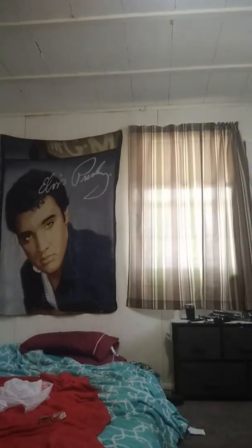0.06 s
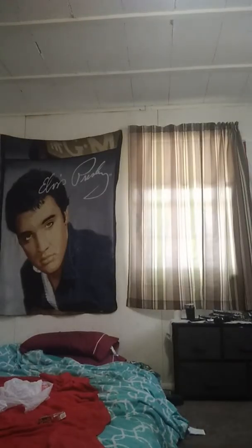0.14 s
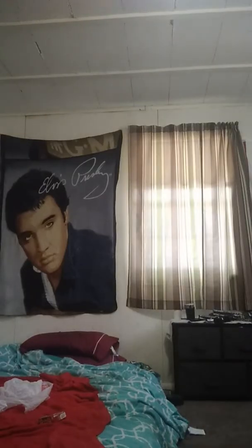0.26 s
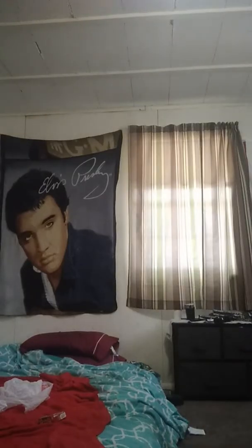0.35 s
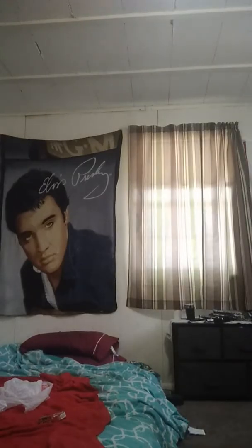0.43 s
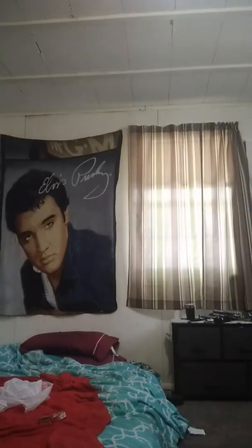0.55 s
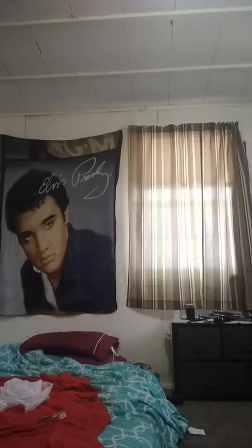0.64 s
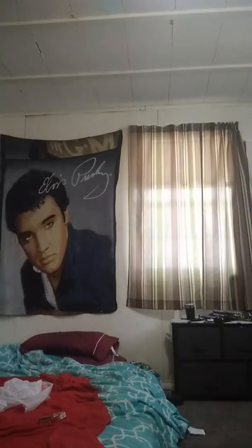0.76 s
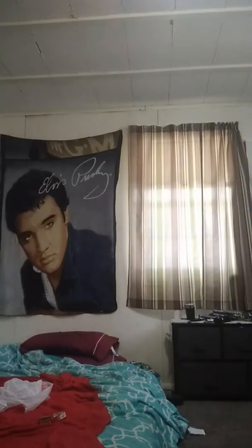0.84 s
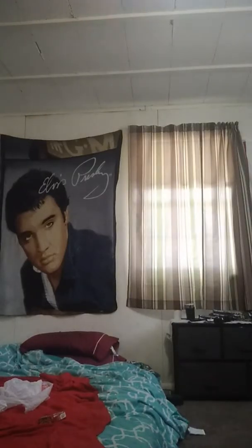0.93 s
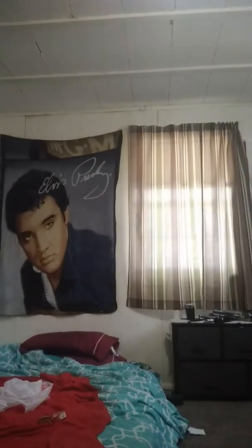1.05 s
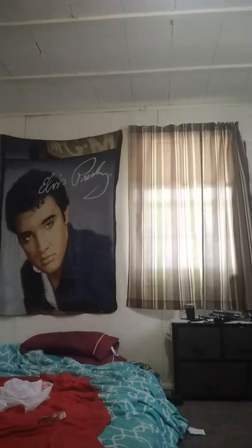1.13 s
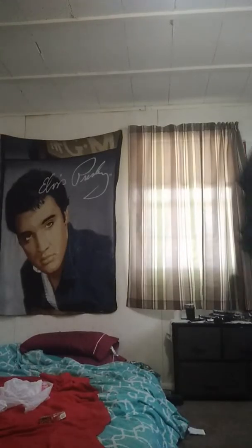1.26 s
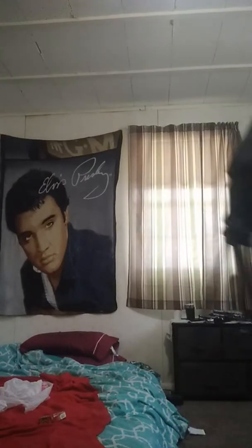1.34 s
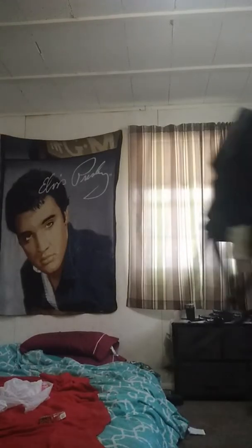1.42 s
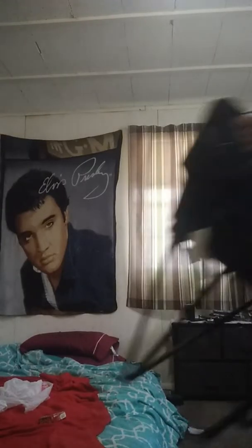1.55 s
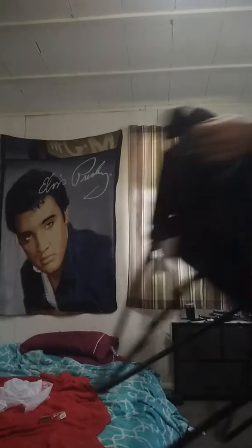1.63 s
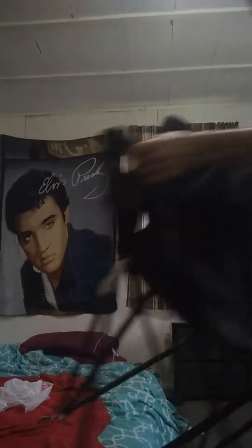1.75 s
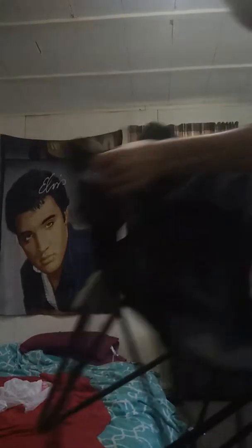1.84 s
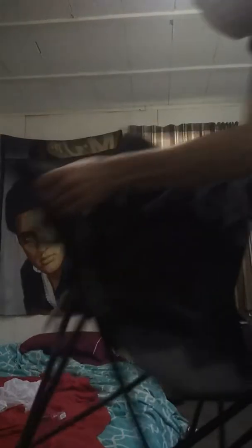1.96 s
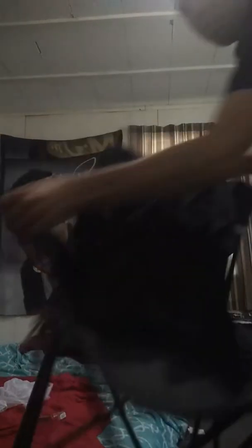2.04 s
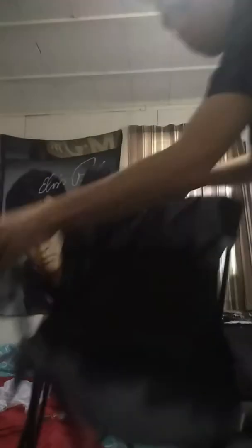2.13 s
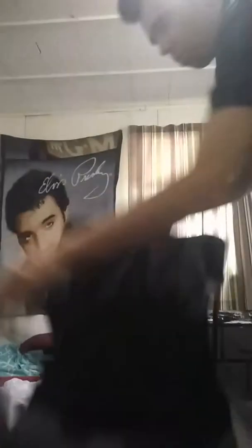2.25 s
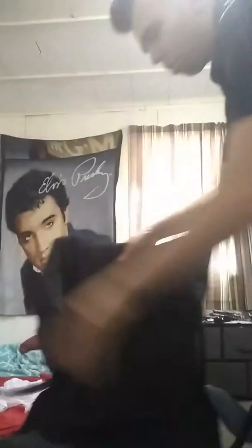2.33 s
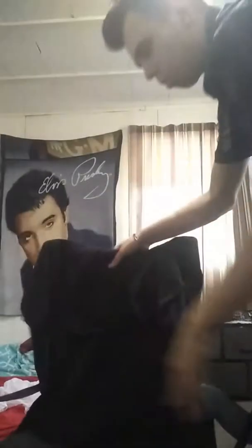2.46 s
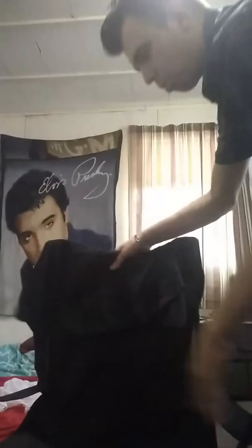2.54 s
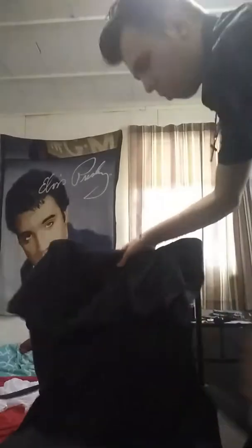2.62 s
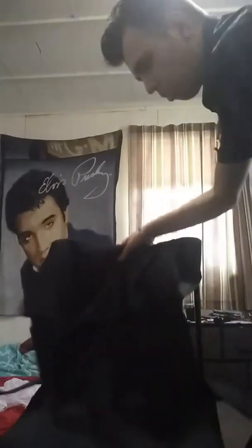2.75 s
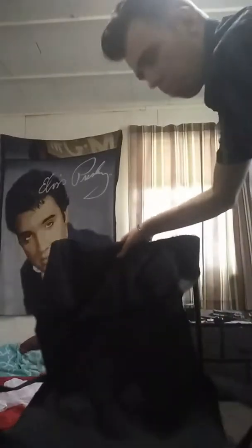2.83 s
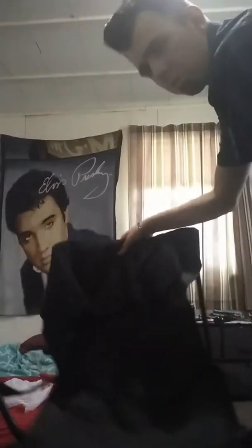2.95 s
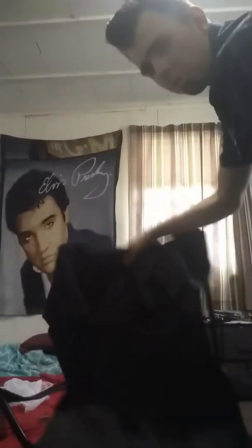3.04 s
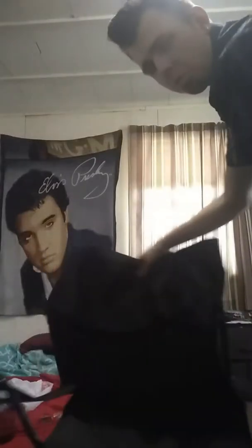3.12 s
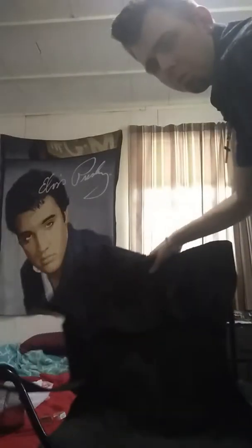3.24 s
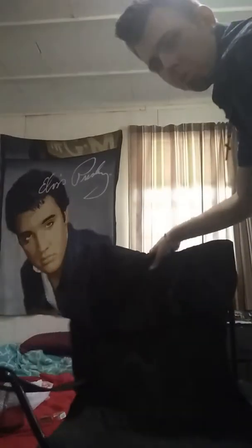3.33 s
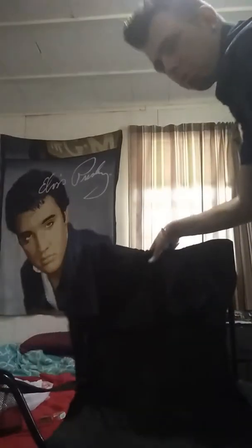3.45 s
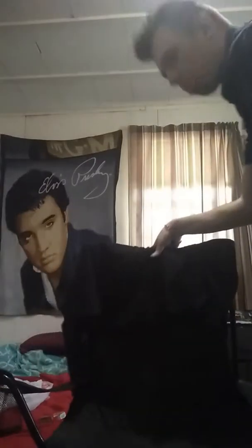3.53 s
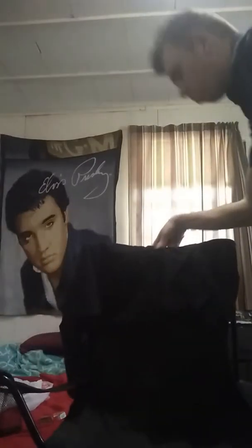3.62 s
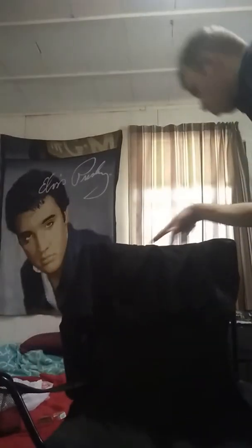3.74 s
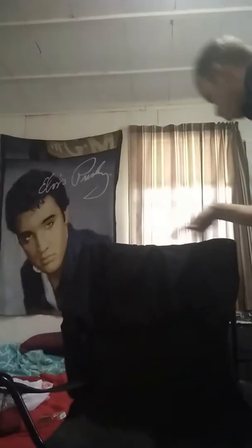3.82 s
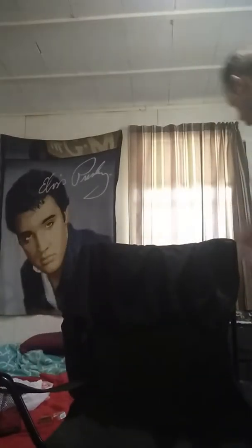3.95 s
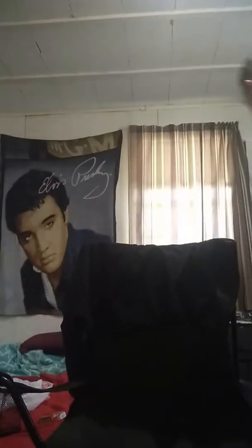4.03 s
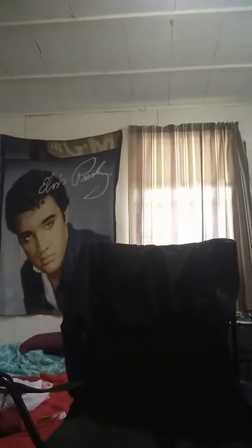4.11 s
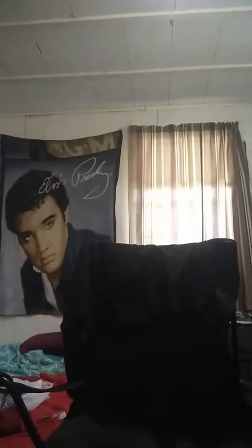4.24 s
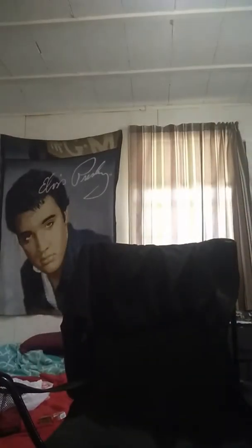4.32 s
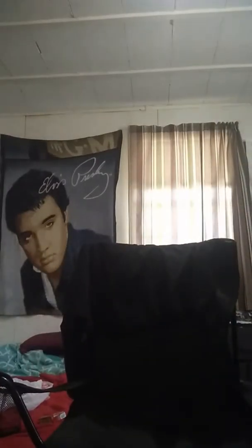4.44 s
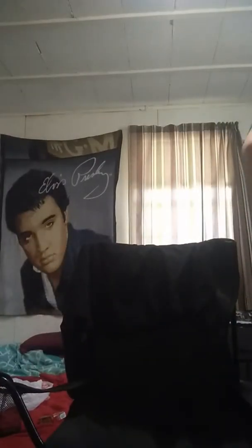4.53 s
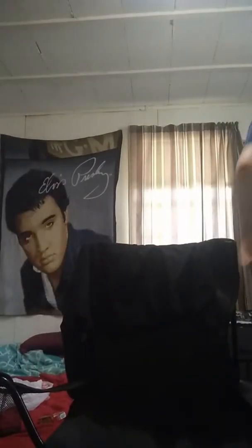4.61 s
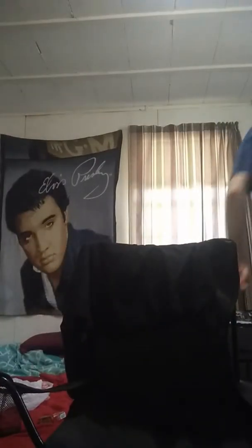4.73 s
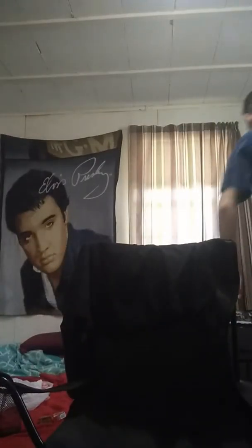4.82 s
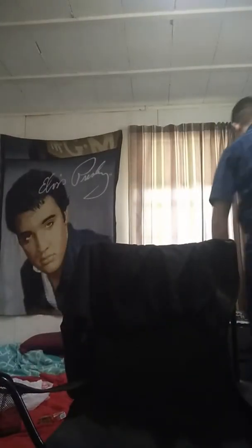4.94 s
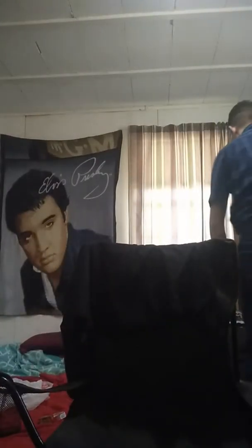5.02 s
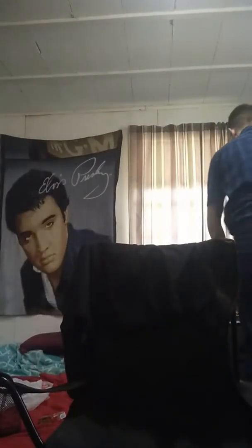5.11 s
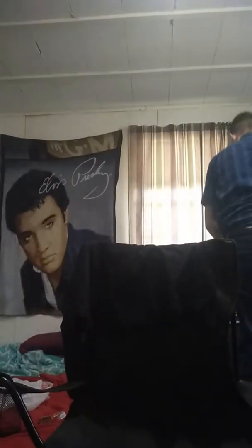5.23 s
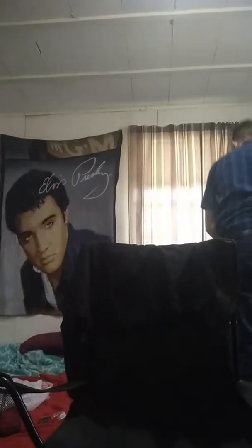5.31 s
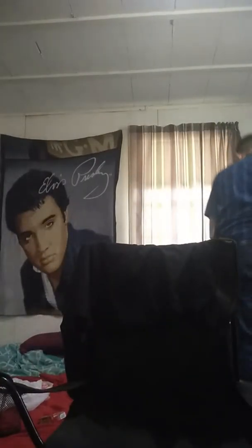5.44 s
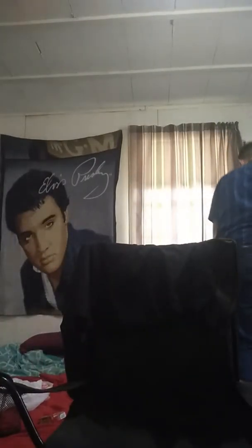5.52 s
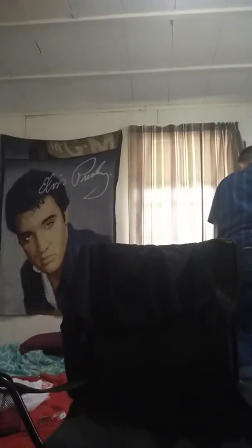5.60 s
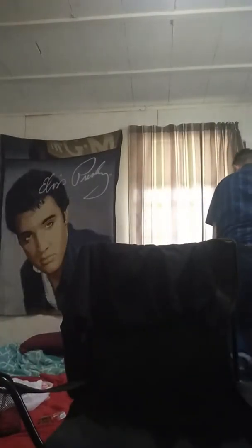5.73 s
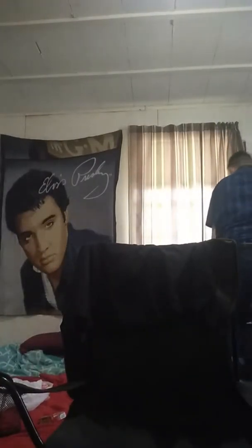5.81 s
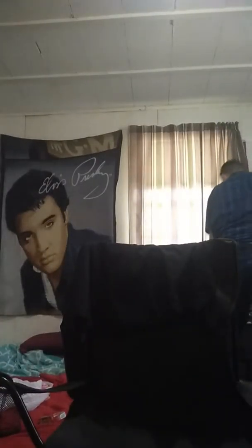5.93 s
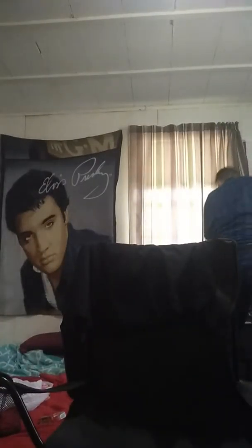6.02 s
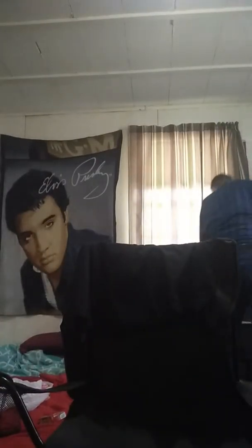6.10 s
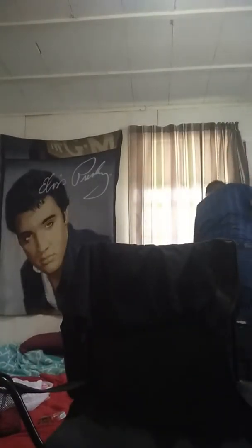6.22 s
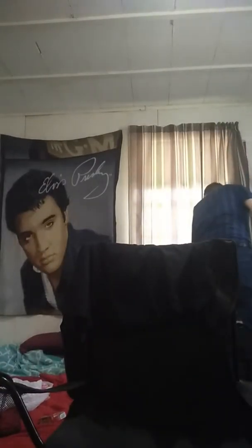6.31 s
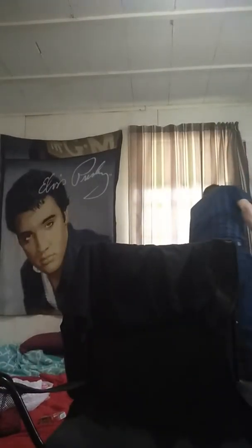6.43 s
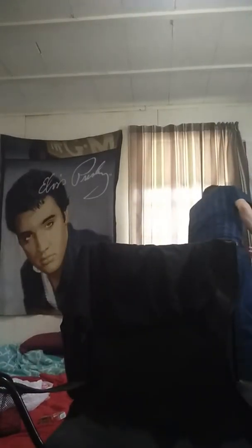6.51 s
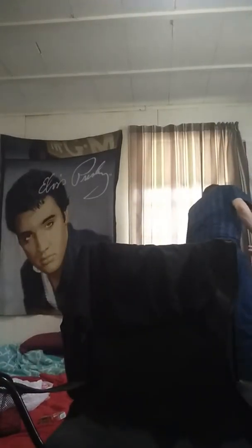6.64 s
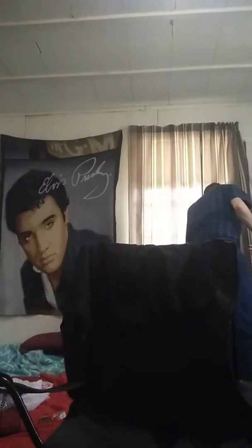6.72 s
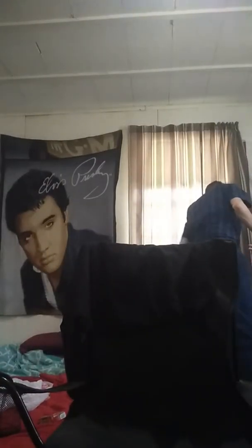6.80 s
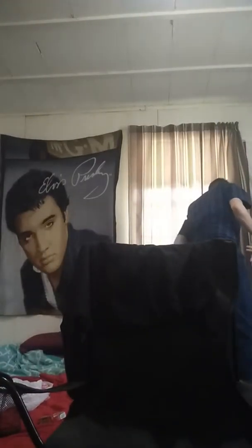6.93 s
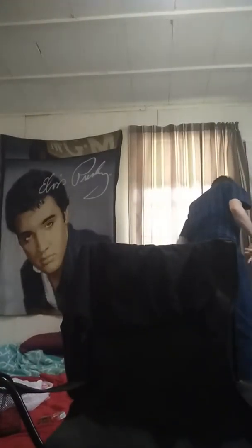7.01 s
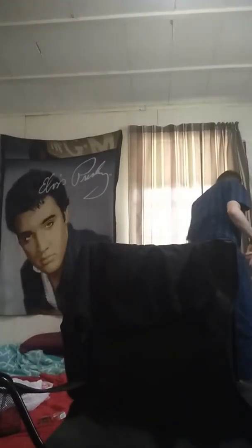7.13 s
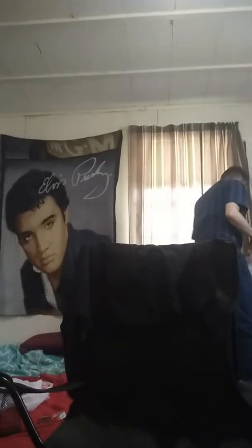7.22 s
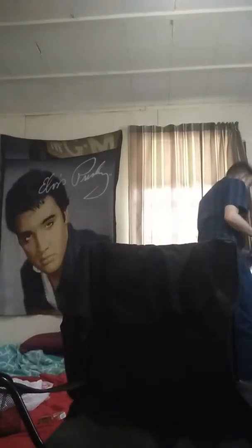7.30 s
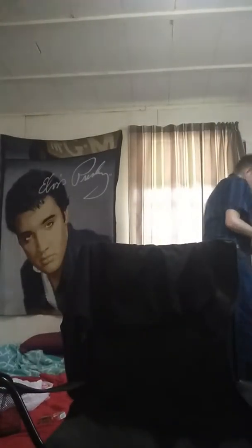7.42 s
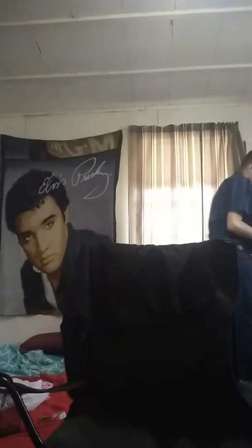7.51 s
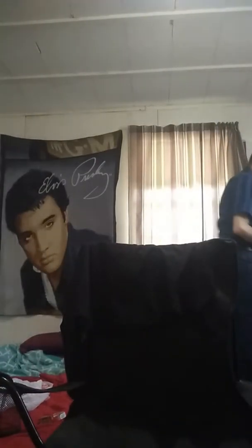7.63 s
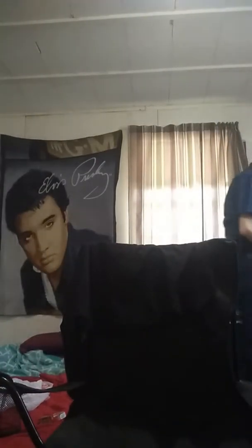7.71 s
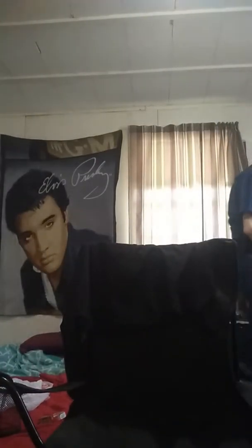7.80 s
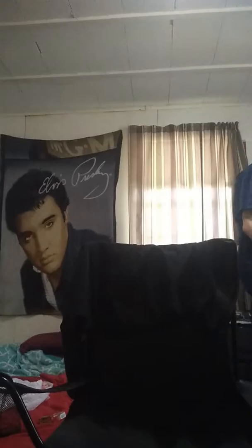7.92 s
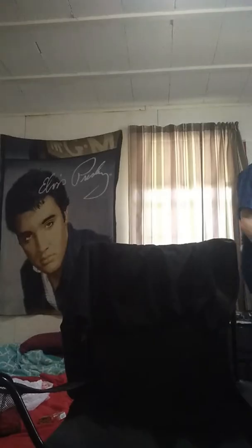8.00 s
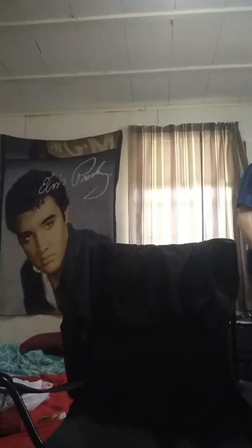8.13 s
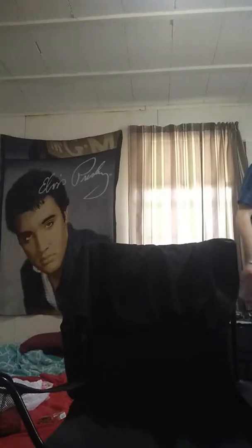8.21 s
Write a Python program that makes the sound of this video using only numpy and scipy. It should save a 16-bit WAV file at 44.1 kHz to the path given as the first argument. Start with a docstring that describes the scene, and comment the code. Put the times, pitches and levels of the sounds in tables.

```python
"""Folding chair and fan in a small bedroom.

A chair of steel tubes and cloth is set down and dragged; footsteps and a switch clack join its knocks.
Excited modes make rattle, knocks and floor rumble; filtered noise makes cloth and fan, which runs up.
Decaying sines make floor booms; delays add the room; a noise gate lowers and flickers quiet moments.
"""
import sys
import numpy as np
from scipy import signal
from scipy.fft import rfft, irfft, next_fast_len
from scipy.io import wavfile
from scipy.ndimage import uniform_filter1d

SR = 44100
rng = np.random.default_rng(int(sys.argv[2]) if len(sys.argv) > 2 else 0)


def wav_out(sig):
    """Save sig, one row per channel (or a flat mono array), as 16-bit PCM at SR to the path in sys.argv[1]."""
    wavfile.write(sys.argv[1], SR, np.round(np.clip(np.atleast_2d(sig).T, -1, 1) * 32767).astype(np.int16))


N = 364266


def from_db(db):
    """Decibels to amplitude gain."""
    return 10 ** (np.asarray(db) / 20)


def rms_one(x):
    """Scale to unit rms."""
    return x / np.sqrt(np.mean(x ** 2) + 1e-20)


def in_time(rows, before=None, after=None):
    """Table columns after t/s, interpolated per sample."""
    time_s, *columns = np.transpose(rows)
    return [np.interp(np.arange(N) / SR, time_s, c, before, after) for c in columns]


def drift(rate_hz):
    """Slow noise of unit rms: two equal poles at rate_hz, run at SR / 40."""
    r = np.exp(-80 * np.pi * rate_hz / SR)
    noise = rng.standard_normal(N // 40 + 2002)
    slow = signal.lfilter([1], [1, -2 * r, r * r], noise)[2000:]  # drop settling
    return np.interp(np.arange(N) / 40, np.arange(len(slow)), rms_one(slow))


def coloured(x, spectrum):
    """Shape a white signal, dB linear in log f; unit rms."""
    hz, db = np.transpose(spectrum)
    grid_hz = np.maximum(np.arange(N // 2 + 1) * SR / N, 1)
    gain = from_db(np.interp(np.log(grid_hz), np.log(hz), db))
    return rms_one(irfft(rfft(x) * gain, N))


def ring(x, hz, t60_s):
    """Two-pole resonator: a unit click starts a decaying sine of initial height about 1."""
    r, w = from_db(-60 / (t60_s * SR)), 2 * np.pi * hz / SR
    return signal.lfilter([0, np.sin(w)], [1, -2 * r * np.cos(w), r * r], x + 1e-18)


def grains(per_s, spread_db):
    """Random clicks of random sign and uneven size."""
    sizes = from_db(spread_db * np.minimum(rng.exponential(1, N), 4)) * rng.choice([-1, 1], N)
    return sizes * (rng.random(N) < per_s / SR)


def cut(x, hz, kind):
    """Second-order high- or low-pass."""
    return signal.sosfilt(signal.butter(2, hz, kind, fs=SR, output="sos"), x)


def place(out, start_s, sound):
    """Track with a sound added at start_s."""
    i = round(start_s * SR)
    n = min(len(sound), N - i)
    return np.concatenate([out[:i], out[i:i + n] + sound[:n], out[i + n:]])


# quiet-house noise spectrum: f/Hz, relative level/dB per Hz
STILL_SPECTRUM = [(18, -44), (30, -19.5), (42, -13), (64, -10.5), (85, -23.5), (208, -16.5), (243, -22),
                  (299, -24), (492, -26.5), (575, -26.5), (1330, -32.5), (4540, -38.5), (15500, -45.5)]
STILL_RMS_DB = -56


def still_house():
    """Stationary coloured noise of the quiet house."""
    return from_db(STILL_RMS_DB) * coloured(rng.standard_normal(N), STILL_SPECTRUM)


HUM_HZ, HUM_DB, HUM_OCTAVE_DB, HUM_WAVER_DB = 58.9, -56, -8, 1.5


def hum():
    """Low tone and its octave, wavering together in level."""
    phase = 2 * np.pi * HUM_HZ * np.arange(N) / SR
    tones = np.sin(phase) + from_db(HUM_OCTAVE_DB) * np.sin(2 * phase)
    return from_db(HUM_DB + HUM_WAVER_DB * drift(8)) * np.sqrt(2) * tones


TICKS_PER_S, TICK_DB, TICK_T60_S = 12, -59, .04


def ticks():
    """Sparse random faint ticks: decaying puffs of band-limited noise that briefly lift the gate."""
    r = from_db(-60 / (TICK_T60_S * SR))
    clicks = np.abs(grains(TICKS_PER_S, spread_db=2.0))
    puffs = signal.lfilter([1], [1, -r], clicks + 1e-18)
    grit = rms_one(cut(cut(rng.standard_normal(N), 150, "high"), 1500, "low"))
    return from_db(TICK_DB) * puffs * grit


# faint tones: start t/s, end t/s, mean level/dB, f/Hz
WHINES = [(1.795, 1.885, -69, 11900), (6.43, 6.48, -56, 1140), (7.8, 7.88, -65, 11900)]


def whines():
    """Short sines with 15 ms ramps, wavering in level."""
    t, waver = np.arange(N) / SR, from_db(7.5 * drift(30))
    tones = np.zeros(N)
    for start_s, end_s, db, hz in WHINES:
        ramps = np.clip(np.minimum(t - start_s, end_s - t) / 0.015, 0, 1)
        tones += from_db(db) * ramps * np.sin(2 * np.pi * hz * t)
    return waver * tones


# fan airflow spectrum: f/Hz, relative level/dB per Hz
FAN_SPECTRUM = [(35, -28.5), (60, 2), (148, -8), (194, -0.5), (283, -10), (458, -4.5), (520, -14.5),
                (697, -7), (860, -12), (1310, -14), (1720, -23), (2350, -23), (9000, -42.5), (11700, -42),
                (19800, -120)]
# casing resonances: f/Hz, nominal width/Hz, level/dB re airflow
FAN_CASING = [(1316, 150, -14.5), (2358, 280, -16)]
# fan run-up: t/s, mean airflow level/dB
FAN_RUN_UP = [(6.0, -59.5), (6.4, -56.5), (6.65, -53), (7.1, -45.5), (7.6, -41), (8.26, -37.5)]


def fan():
    """Airflow noise plus casing resonances; level rises with run-up, spectrum stays fixed."""
    air = coloured(rng.standard_normal(N), FAN_SPECTRUM)
    casing = np.zeros(N)
    for hz, width_hz, db in FAN_CASING:
        resonance = ring(rng.standard_normal(N), hz, 2.5 / width_hz)
        casing += from_db(db) * rms_one(resonance)
    level_db, = in_time(FAN_RUN_UP, before=-120)
    return from_db(level_db + 1.13 * drift(15.5)) * (air + casing)


# weight landing on floor: t/s, nominal level/dB (1 dB added), boom f/Hz, t60/s
THUMPS = [(0.247, -33, 56, 0.17), (1.549, -12.5, 61.7, 0.15), (2.238, -18, 81, 0.13),
          (2.242, -11, 191, 0.07), (2.589, -37, 101, .2), (4.796, -33, 109.3, 0.21),
          (5.422, -32, 55.6, 0.17), (5.506, -36, 130.8, 0.194), (5.982, -30, 56.8, 0.15),
          (7.281, -9, 110, 0.088), (7.455, -29, 114, 0.16)]


def thumps():
    """Soft push sets the floor booming: decaying sine with smooth onset."""
    out, t = np.zeros(N), np.arange(SR // 2) / SR
    for start_s, db, hz, t60_s in THUMPS:
        swell = 1 - np.exp(-t / 0.0068)
        envelope = from_db(db + 1 - 60 * t / t60_s) * swell
        out = place(out, start_s, -envelope * np.sin(2 * np.pi * hz * t))
    return out


# thin high ringing bands: t/s, nominal level/dB (6 dB added), f/Hz, envelope t60/s
HIGH_RINGS = [(.607, -52, 6304, .1), (.607, -52, 9421, .2), (.607, -58, 12230, .1), (1.402, -49, 7500, .4),
              (1.402, -54, 8180, .4), (2.3, -49, 7550, .35), (2.296, -50, 12100, .1),
              (7.226, -52, 3600, .1), (7.226, -54, 4500, .1)]


def high_rings():
    """Thin high ringing bands: narrow noise at f, dying away."""
    out, t = np.zeros(N), np.arange(SR // 2) / SR
    for start_s, db, hz, t60_s in HIGH_RINGS:
        narrow = rms_one(ring(rng.standard_normal(len(t)), hz, .025))
        out = place(out, start_s, from_db(db + 6 - 60 * t / t60_s) * narrow)
    return out


# bright skids of steel legs: t/s, level/dB before decay, nominal f/Hz (both cutoffs near 0.83 f), t60/s
SKIDS = [(2.246, -29, 8150, 0.36), (6.727, -31.5, 8800, 0.13), (7.459, -37, 9040, 0.1)]


def skids():
    """Steel legs skid on the floor: uneven bright noise dying away."""
    out, t = np.zeros(N), np.arange(SR // 2) / SR
    for start_s, db, hz, t60_s in SKIDS:
        shake = rng.standard_normal(len(t)) * from_db(2.2 * drift(80)[:len(t)])
        bright = cut(cut(shake, hz / 1.2, "high"), hz / 1.2, "high")
        band = rms_one(cut(bright, hz * 0.83, "low"))
        envelope = from_db(db - 60 * t / t60_s) * (1 - np.exp(-t / 0.002))
        out = place(out, start_s, envelope * band)
    return out


# moves of chair and feet: start t/s, nominal held-until t/s, nominal end t/s (a few rows out of order),
# rattle level/dB, rustle level/dB, cloth treble lift/dB, rumble level/dB
MOVES = [(0.148, 0.196, 0.22, -54, -48.5, -3, -50), (0.228, 0.4, 0.48, -46.5, -51, 5, -39.5),
         (0.395, 0.58, 0.62, -45, -52, 6, -52), (0.603, 0.697, 0.72, -44, -46.5, 2, -57),
         (0.69, 0.819, 0.9, -41, -49, 0, -52), (1.352, 1.506, 1.594, -46, -43, 3, -60),
         (1.53, 1.6, 1.8, -39.5, -42, -0.5, -34), (1.688, 1.865, 1.884, -51, -55, 2, -42),
         (1.918, 1.95, 2.02, -61, -63.5, 4, -58), (1.955, 1.98, 1.988, -61, -58.5, 5, -48),
         (1.991, 2.015, 1.96, -62, -60, 7.5, -58), (2.067, 2.144, 2.166, -71, -46, 4.5, -51),
         (2.224, 2.262, 2.44, -43, -33, 13.5, -26), (2.34, 2.48, 2.54, -44.5, -48.5, -2, -41),
         (2.563, 2.695, 2.76, -39, -42.5, -0.5, -44), (2.702, 2.785, 2.802, -49, -51, 6, -56),
         (2.858, 2.875, 2.9, -56, -60, 4, -54), (2.955, 3.034, 3.13, -60, -54, 7.5, -49.5),
         (3.045, 3.077, 3.24, -58, -35, -6, -39), (3.236, 3.255, 3.29, -42, -41.5, -10.5, -42),
         (3.391, 3.551, 3.57, -74, -47.5, 6, -52), (3.865, 3.885, 3.893, -60, -60, 4, -50),
         (4.037, 4.088, 4.102, -70, -60, 4.5, -49), (4.108, 4.138, 4.152, -62, -50, 8, -52),
         (4.748, 4.86, 4.91, -71.5, -54.5, 3, -37), (5.334, 5.385, 5.46, -62, -54, 6, -44.5),
         (5.42, 5.459, 5.497, -59.5, -61, 2.5, -43.5), (5.499, 5.535, 5.6, -56.5, -58.5, 5, -42.5),
         (5.942, 6.018, 6.01, -62, -52.5, 1, -42.5), (6.67, 6.72, 6.5, -50, -50, -2, -50),
         (6.72, 6.776, 6.88, -37, -37, 5.5, -48), (6.8, 6.882, 6.8, -47, -58, -4, -48),
         (7.223, 7.294, 7.38, -44, -44, -0.5, -32), (7.454, 7.48, 7.53, -62, -35, 0.5, -49)]
RISE_MAX_S, RISE_DB = .03, 8.0
END_MAX_DB, FADE_DB_PER_S = -56.5, 1200


def strength(column):
    """Layer gain from interpolated move levels; powers add."""
    power, t = np.zeros(N), np.arange(N) / SR
    for row in MOVES:
        start, held, end, db = *row[:3], row[column]
        near = slice(max(round((start - .01) * SR), 0), round((end + .1) * SR))
        held = np.clip(held, start + .004, end - .002)
        end_db = min(db, END_MAX_DB)
        full = start + min(RISE_MAX_S, (held - start) / 3)
        times_s = [start - .01, start, full, held, end, end + .1]
        levels_db = [db - 60, db - RISE_DB, db, db, end_db, end_db - FADE_DB_PER_S / 10]
        power[near] += from_db(2 * np.interp(t[near], times_s, levels_db))
    return np.sqrt(power)


# frame modes: f/Hz, level/dB, knock t60/s (scaled in rattle)
FRAME = [(261, -5, 0.12), (376.6, -1.5, 0.054), (508, 3, 0.032), (647.5, -3, 0.056), (895, 0.5, 0.023),
         (1029, 1.5, 0.044), (1268, -4.5, 0.029), (1820, 0, 0.019), (2098, -11.5, .04), (2560, -18.5, .04),
         (3000, -15, 0.013), (3870, -12.5, 0.022)]


def tube_rattle():
    """Loose joints tick into the frame modes; unit rms."""
    joints = [grains(700, spread_db=4.0) for _ in range(3)]
    rattle = np.zeros(N)
    for k, (hz, db, t60_s) in enumerate(FRAME):
        rattle += from_db(db) * ring(joints[k % 3], hz, 0.24 * t60_s)
    return rms_one(rattle)


def patchy(x, patch_db):
    """Folds of cloth slip in turn: each band swells and fades on its own; unit rms."""
    edges_hz = np.geomspace(400, 16000, 9)
    total = np.zeros(N)
    for pair in zip(edges_hz, edges_hz[1:]):
        band = signal.sosfilt(signal.butter(1, pair, "band", fs=SR, output="sos"), x)
        total += from_db(patch_db * drift(18)) * band
    return rms_one(total)


# cloth spectrum: f/Hz, relative level/dB per Hz
CLOTH = [(500, 5), (1500, -0.5), (2500, 2), (4500, -4), (7000, -10), (10000, -14.5), (16000, -23.5)]


def cloth_rustle():
    """Fibres slip: dense shaped clicks, patchy by band, with treble lift interpolated between moves."""
    lift_db, = in_time(sorted((s, row[5]) for row in MOVES for s in row[:2]))
    slips = grains(5000, spread_db=3.0) * from_db(1.2 * drift(45))
    rustle = patchy(coloured(slips, CLOTH), patch_db=1.5)
    treble = cut(rustle, 4000, "high")
    return rustle + (from_db(lift_db) - 1) * treble


# floor modes: f/Hz, nominal width/Hz (t60 = 3 / width), level/dB
BOARDS = [(54.6, 44, 2.5), (87.4, 8.3, 0), (115, 85, 2), (172, 34, -10), (226, 83, -0.5)]


def floor_rumble():
    """Boards carry the load: one noise drives all floor modes; unit rms."""
    load = rng.standard_normal(N)
    rumble = np.zeros(N)
    for k, (hz, width_hz, db) in enumerate(BOARDS):
        gain = from_db(db) * np.sqrt(width_hz / hz) * (-1) ** k
        rumble += gain * ring(load, hz, 3.0 / width_hz)
    return rms_one(rumble)


def handling():
    """Tube rattle, cloth rustle and floor rumble, each with its gain from the moves."""
    rattle = strength(column=3) * tube_rattle()
    rustle = strength(column=4) * cloth_rustle()
    return rattle + rustle + strength(column=6) * floor_rumble()


# knocks: t/s, nominal level/dB, strongest-region f/Hz, crack level/dB re body (before mix gains)
KNOCKS = [(0.125, -40.5, 700, -3), (0.164, -38.5, 840, 1), (0.327, -32, 1020, 11), (0.397, -21.5, 870, 6),
          (0.478, -28, 730, -17), (0.51, -31.5, 479, 12), (0.608, -28.5, 1010, -5), (0.652, -25, 1580, -5),
          (0.724, -21, 715, -19), (0.761, -21.5, 900, -2), (0.906, -41, 500, -7), (1.007, -31, 401, -20),
          (1.278, -39.5, 755, 7), (1.308, -43.5, 600, -4.5), (1.353, -20, 910, -25), (1.513, -23, 2020, -6),
          (1.618, -26, 493, 1), (1.9, -41.5, 500, -5), (1.962, -38, 401, -5), (2.074, -33.5, 596, 5),
          (2.226, -24, 464, 15), (2.24, -16, 530, -14), (2.259, -11, 438, 0), (2.359, -18.5, 487, -21),
          (2.45, -28.5, 522, 9), (2.463, -21, 824, 2.5), (2.563, -34.5, 400, -15), (2.592, -23, 430, -12),
          (2.641, -15.5, 695, 14), (2.668, -23.5, 1010, -8), (2.84, -44, 398, -2), (2.863, -39, 436, -3),
          (3.015, -22.5, 440, -1), (3.05, -9, 482, 8), (3.091, -23.5, 401, 4), (3.101, -23.5, 2000, 18),
          (3.111, -30, 520, -9), (3.243, -23, 1660, 5), (3.606, -43, 500, -4.5), (3.868, -41, 432, -5),
          (4.042, -42, 400, -5), (4.068, -43.5, 403, -11), (4.115, -41, 3360, -5), (4.281, -43, 400, -5),
          (4.319, -40, 510, -14.5), (4.378, -47, 2500, 0), (4.767, -40, 940, -4.5), (5.361, -36, 806, -5),
          (5.514, -36, 420, -10), (5.694, -41, 950, -2), (5.945, -41.5, 1560, -5), (6.03, -42, 2000, 0),
          (6.453, -46, 1104, -5), (6.505, -40, 417, -10), (6.56, -43, 500, -8), (6.6, -40, 500, -9),
          (6.684, -20, 654, 1), (6.728, -19.5, 1230, 16.5), (6.767, -17, 440, 10), (6.879, -27, 475, -5),
          (7.224, -30, 1100, 10), (7.272, -24.5, 670, 6), (7.459, -20.5, 730, 15), (8.061, -29, 432, 9)]
KNOCK_T60_AT_0_DB_S, LONGER_S_PER_DB, KNOCK_T60_MIN_S = 0.21, .003, .04


def knocks():
    """Grainy crack, then uneven after-contacts heard directly and through modes near the spot struck."""
    out, t = np.zeros(N), np.arange(SR // 4) / SR
    for start_s, db, centre_hz, crack_db in KNOCKS:
        t60_s = max(KNOCK_T60_AT_0_DB_S + LONGER_S_PER_DB * db, KNOCK_T60_MIN_S)
        noise, luck_db = rng.standard_normal((3, len(t))), rng.normal(0, 2, len(FRAME))
        uneven = from_db(2.7 * rms_one(uniform_filter1d(noise[1], size=150)))
        decay = from_db(-60 * t / t60_s)

        scatter_decay = decay + 0.59 * from_db(-60 * t / 0.036)
        scatter = noise[0] * uneven * (1 - np.exp(-t / 0.0014)) * scatter_decay
        scatter[0] = 5.0  # impact click
        modes = np.zeros(len(t))
        for (hz, mode_db, mode_t60_s), chance_db in zip(FRAME, luck_db):
            near_db = -9.0 * np.log2(hz / centre_hz) ** 2
            modes += from_db(mode_db + chance_db + near_db) * ring(scatter, hz, mode_t60_s)
        direct = cut(cut(scatter, centre_hz / 1.6, "high"), centre_hz * 1.49, "low")
        body = rms_one(0.8 * rms_one(modes) + rms_one(direct)) * np.sqrt(t60_s)

        splinters = noise[2] * (from_db(-60 * t / 0.0089) + 0.2 * uneven * decay)
        splinters[0] = 1.9  # first touch
        crack = cut(cut(cut(splinters, 1500, "high"), 3600, "low"), 4500, "low")
        knock = .2 * body + 0.48 * from_db(crack_db) * crack
        out = place(out, start_s, from_db(db) * knock)
    return out


ROOM_T60_S, ROOM_DB, WALL_CUT_HZ = 0.2, -18, 6400  # nominal T60: wall loss shortens the treble


def bedroom(x):
    """Eight feedback delays, duller on every round, summed with alternating sign."""
    size = next_fast_len(N + SR)
    w = 2 * np.pi * np.arange(size // 2 + 1) / size
    pole = np.exp(-2 * np.pi * WALL_CUT_HZ / SR)
    wall, tail = (1 - pole) / (1 - pole * np.exp(-1j * w)), 0
    for k, lag in enumerate(np.geomspace(.009, .029, 8) * SR):
        round_trip = from_db(-60 * lag / SR / ROOM_T60_S) * wall * np.exp(-1j * w * lag)
        tail = tail + (-1) ** k * round_trip / (1 - round_trip)
    return irfft(rfft(x, size) * tail, size)[:N]


def scene():
    """Chair with room tail, floor, house and fan; one channel."""
    chair = knocks() + high_rings() + skids()
    background = still_house() + hum() + ticks() + whines() + fan()
    room = from_db(ROOM_DB) * bedroom(chair)
    return (background + thumps() + handling() + chair + room)[None]


# fully open above GATE_DB, fully shut GATE_KNEE_DB below it
GATE_DB, GATE_KNEE_DB, GATE_DEPTH_DB = -49, 4.5, -14.5
GATE_WINDOW_S, GATE_EDGE_S, GATE_LOW_HZ = 0.0086, .003, 58.3


def noise_gate(x):
    """Gate gain from short-term high-passed power; flickers near threshold."""
    power = uniform_filter1d(cut(x, GATE_LOW_HZ, "high") ** 2, size=round(GATE_WINDOW_S * SR))
    level_db = 10 * np.log10(power + 1e-12)
    shut = np.clip((GATE_DB - level_db) / GATE_KNEE_DB, 0, 1)
    return from_db(GATE_DEPTH_DB * uniform_filter1d(shut, size=round(GATE_EDGE_S * SR)))


MIC_LOW_HZ, STOPBAND_HZ = 40, 16300


def record(dry):
    """Microphone drops deep bass, recorder gates quiet moments, steep low-pass cuts the top."""
    heard = cut(cut(dry, MIC_LOW_HZ, "high"), MIC_LOW_HZ, "high")
    gated = heard * noise_gate(heard[0])
    return signal.sosfilt(signal.cheby2(14, 60, STOPBAND_HZ, fs=SR, output="sos"), gated)


dry = scene()
out = record(dry)
wav_out(out)
```